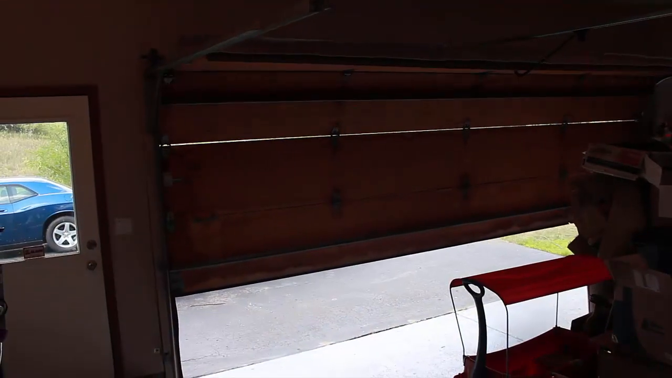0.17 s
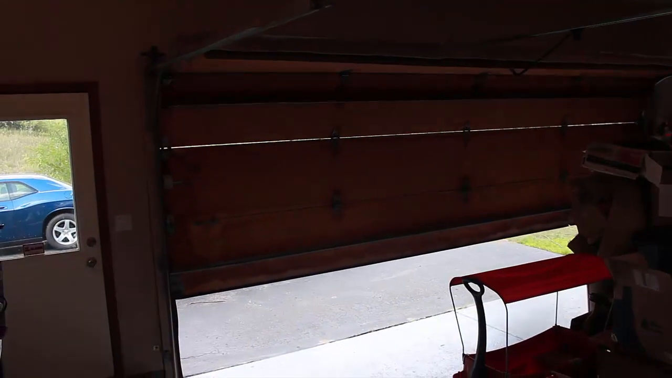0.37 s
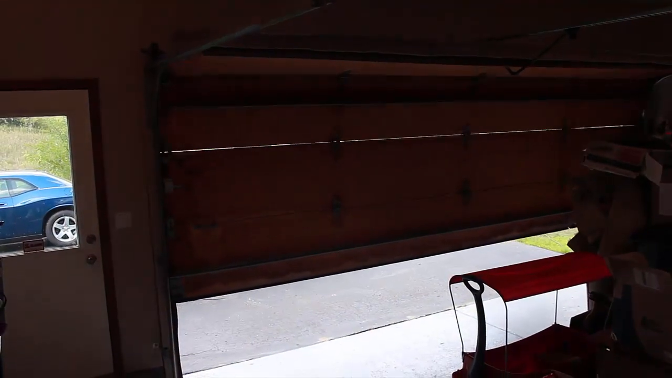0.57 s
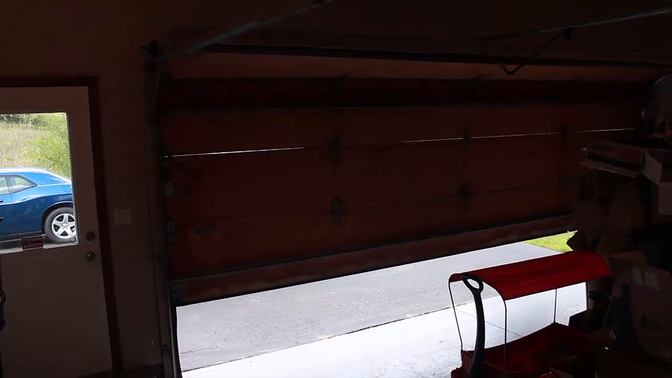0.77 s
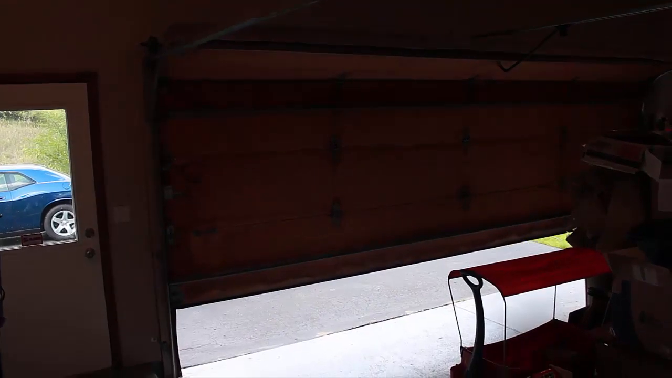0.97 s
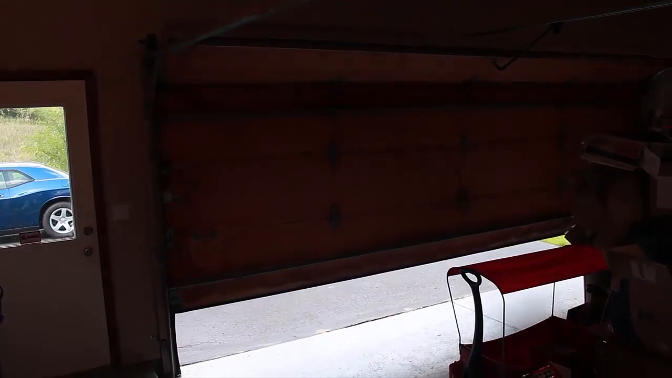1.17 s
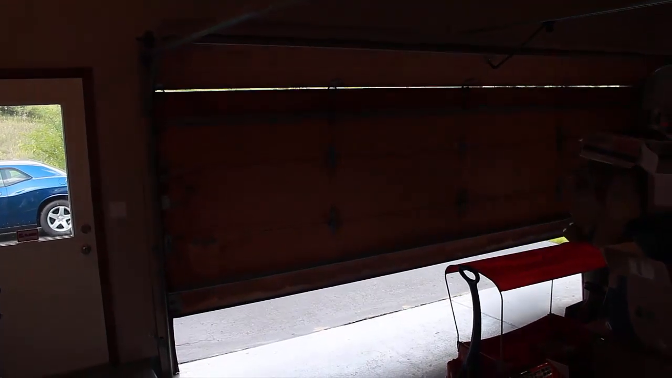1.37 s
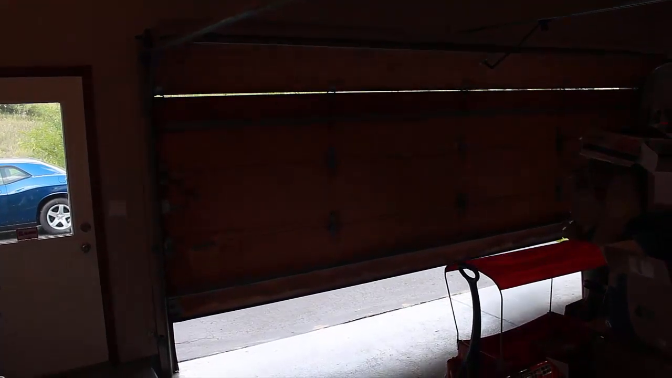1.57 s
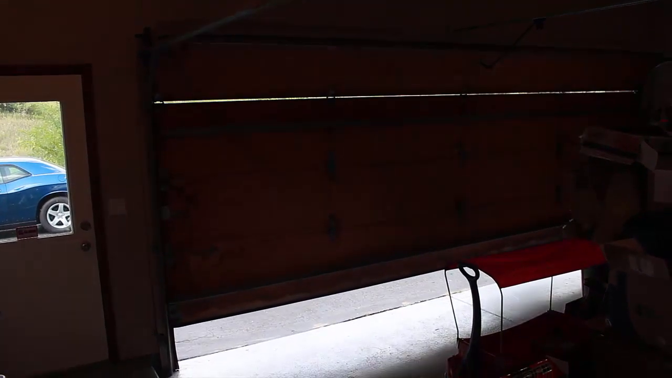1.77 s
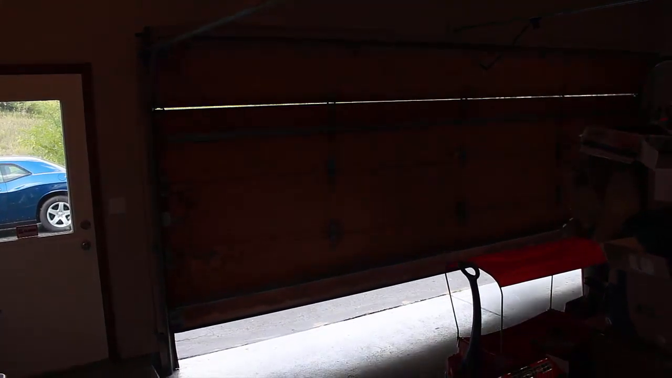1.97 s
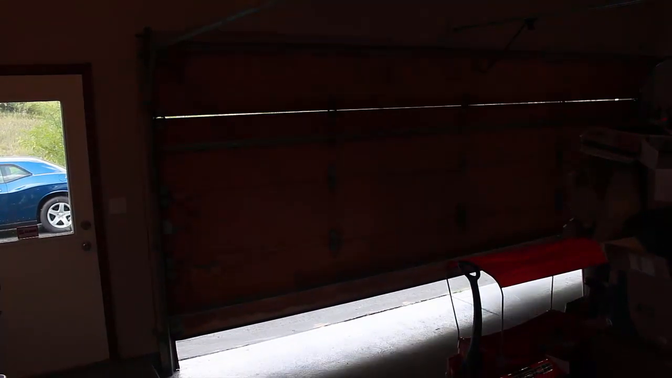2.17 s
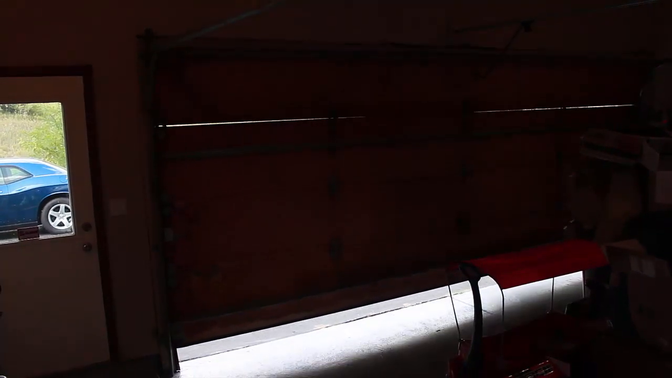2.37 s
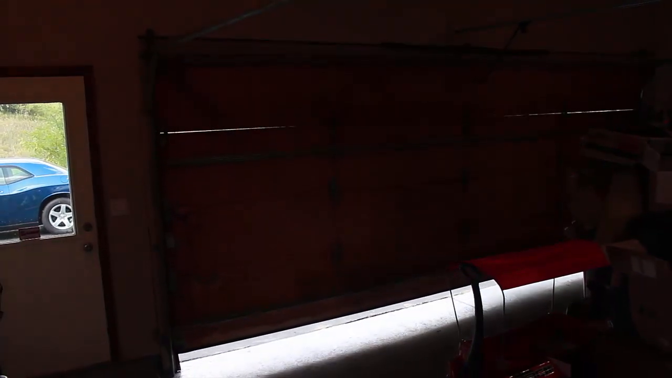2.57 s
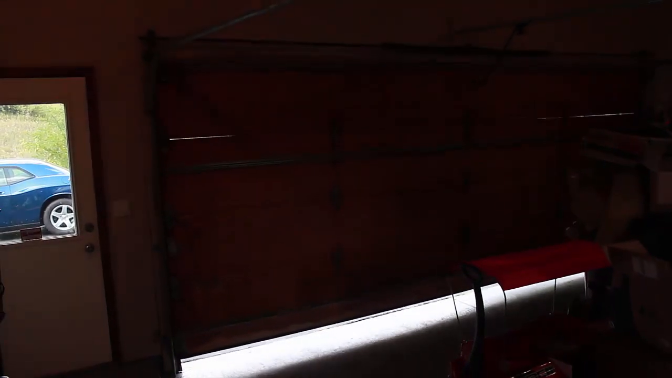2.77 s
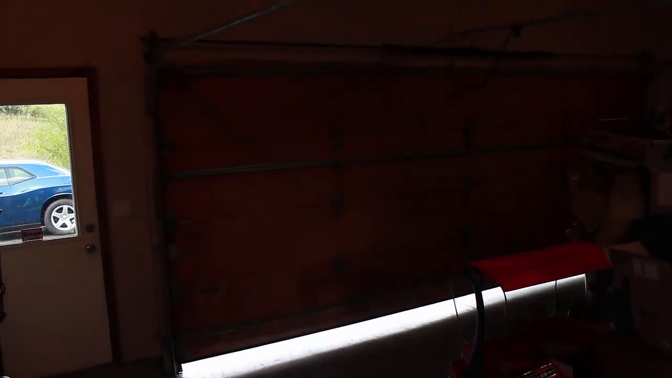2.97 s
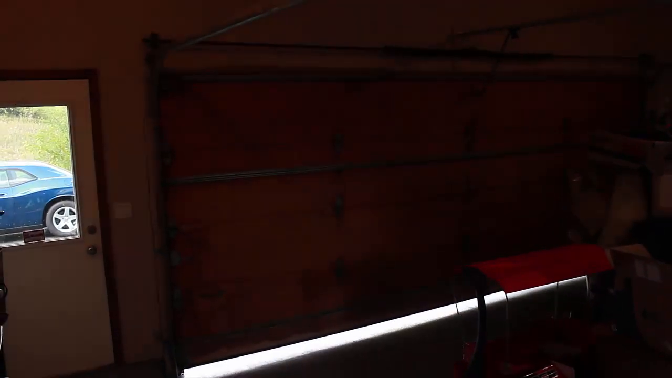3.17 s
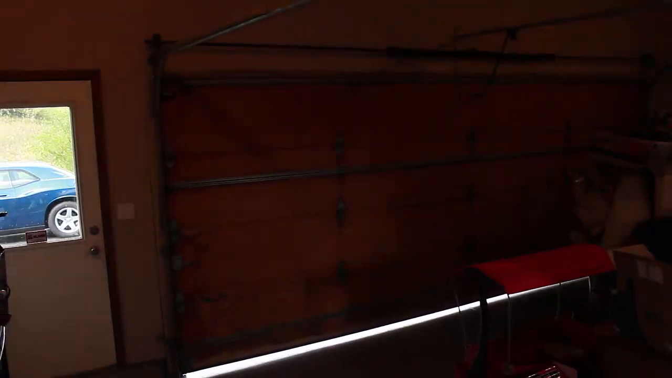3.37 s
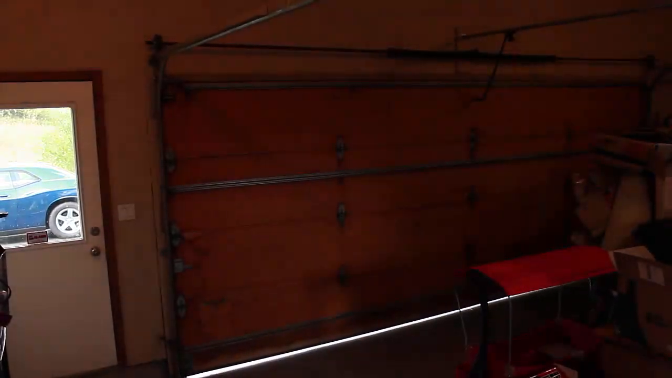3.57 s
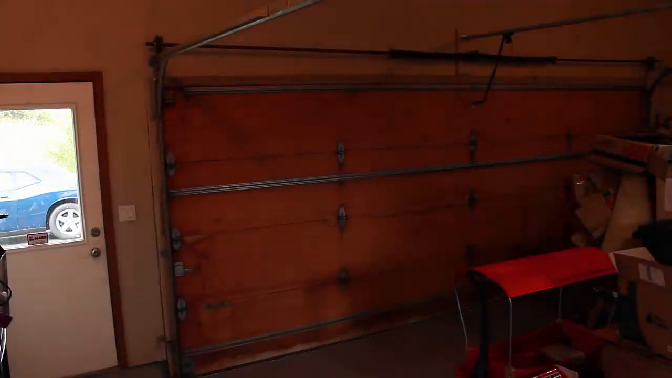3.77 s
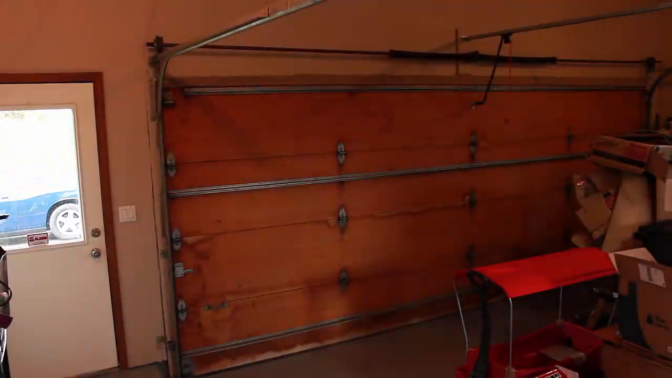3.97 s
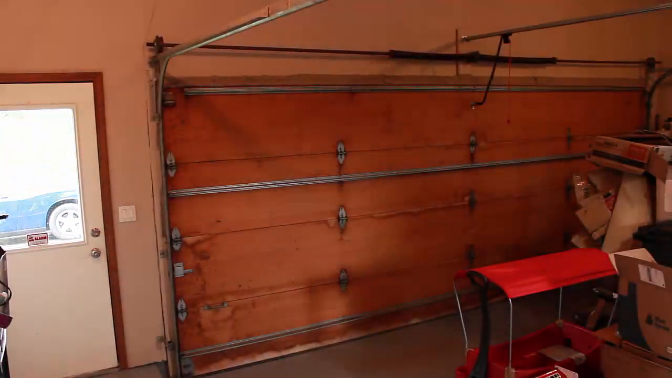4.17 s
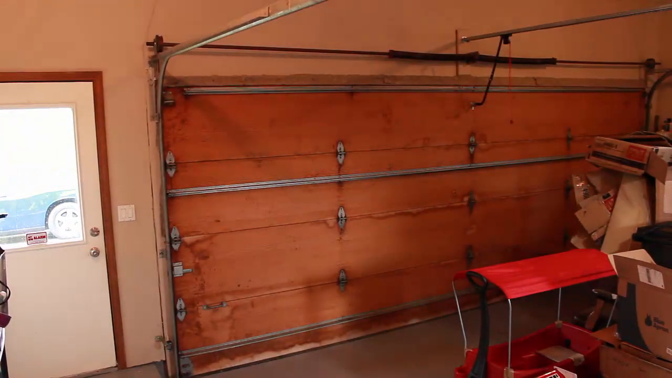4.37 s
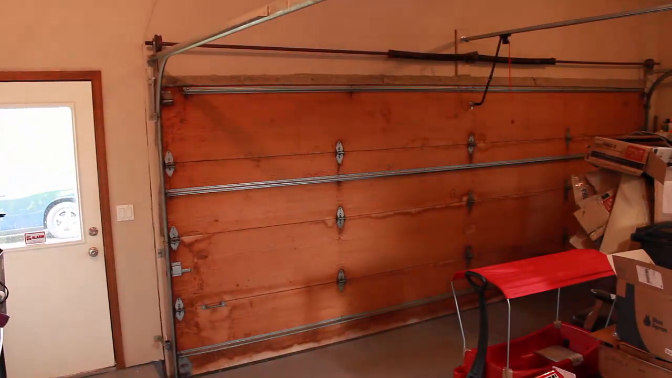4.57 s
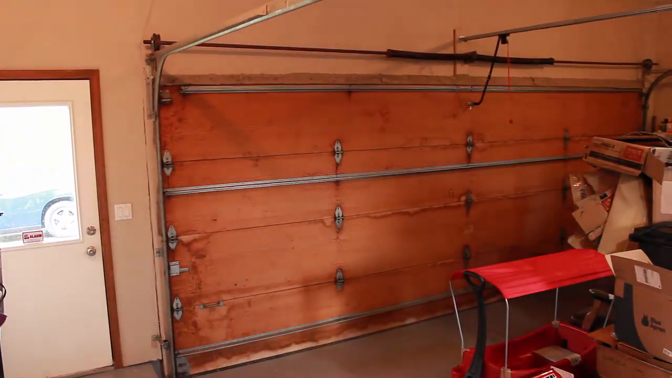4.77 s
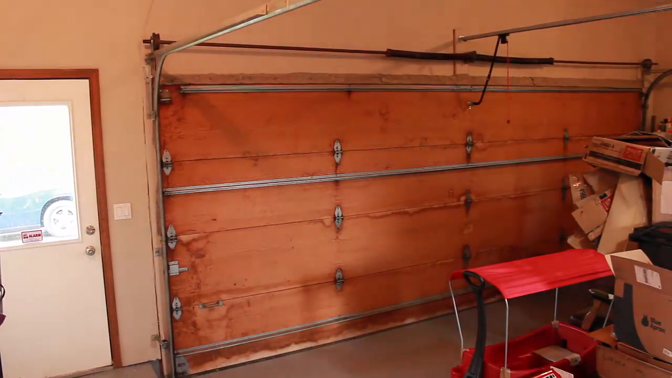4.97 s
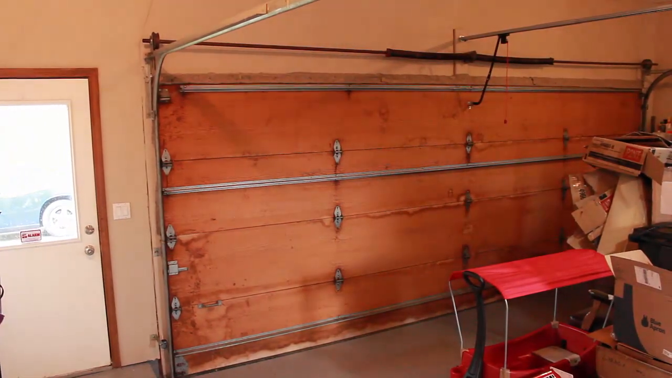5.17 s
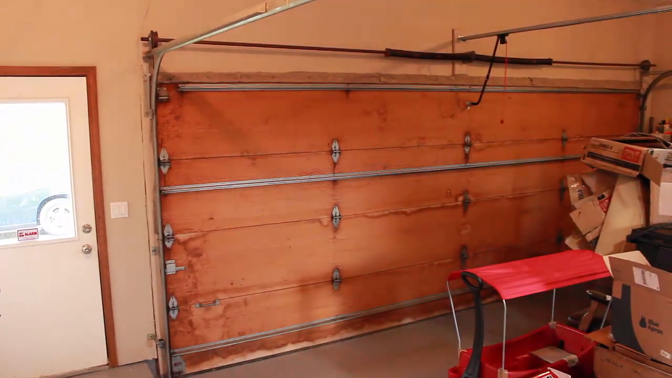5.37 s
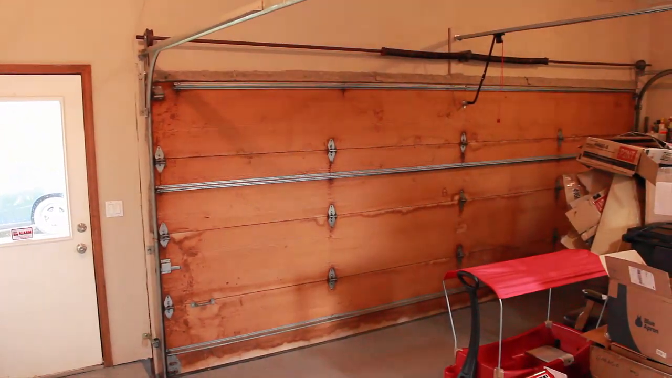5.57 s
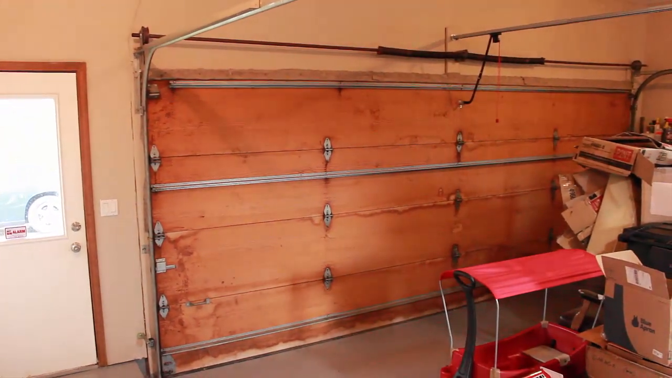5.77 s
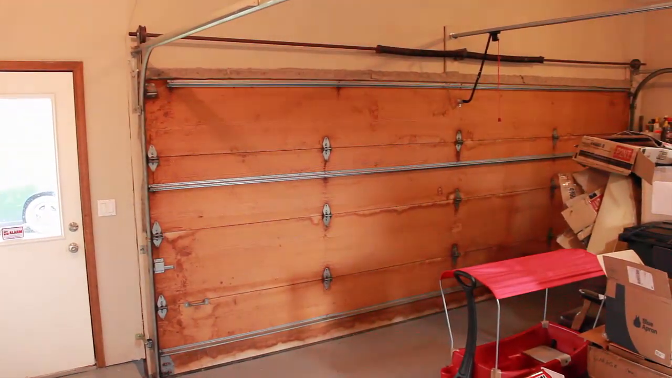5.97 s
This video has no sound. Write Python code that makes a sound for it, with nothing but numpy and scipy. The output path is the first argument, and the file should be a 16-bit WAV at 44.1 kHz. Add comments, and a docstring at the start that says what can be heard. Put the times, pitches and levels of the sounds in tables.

```python
"""In a garage, a heavy wooden door rolls down its steel tracks under a chain opener.
Random impacts filtered by resonant bodies make rattling rollers, clinking chain, rumbling panels and hinge knocks;
noise through narrow resonances makes grinding and a groan, and the edges rub by stick-slip over the last stretch.
A roller whistles as a nearly pure tone, the door thuds on the slab, and the drive stops with a loud
metallic squeal of half-order partials; faint ticks follow over quiet air."""
import sys
import numpy as np
from scipy import signal
from scipy.fft import rfft, irfft, next_fast_len
from scipy.io import wavfile

SR = 44100
rng = np.random.default_rng(int(sys.argv[2]) if len(sys.argv) > 2 else 0)


def transcribe(signal):
    """Save signal, clipped to [-1, 1], as a 16-bit WAV file at the path in sys.argv[1]."""
    frames = np.atleast_2d(signal).T
    limited = np.clip(frames, -1, 1)
    pcm = np.round(limited * 32767).astype(np.int16)
    wavfile.write(sys.argv[1], SR, pcm)


N = 264996
T = np.arange(N) / SR  # time [s]
STOP_S = 3.99  # the door lands and the motion ends

# Resonant response of the hinges and loose hardware: (frequency [Hz], spectral level [dB per Hz])
HINGE = [(150, -17.5), (400, -4.5), (800, -7), (1400, 1), (2100, -2), (2900, -4.5), (4000, -14.5),
         (5500, -20), (8000, -39), (15000, -36)]


def gain_of(db):
    """Amplitude ratio: 20 dB is a factor of ten."""
    return 10 ** (np.asarray(db) / 20)


def evened(x):
    """Normalization to a root-mean-square of 1."""
    return x / np.sqrt(np.mean(x ** 2) + 1e-20)


def read(points, hz):
    """Interpolation of a spectrum along a logarithmic frequency axis."""
    f, value = np.transpose(points)
    return np.interp(np.log(hz + 1), np.log(f + 1), value)


def level(rows, lead=0., axis=1):
    """Envelope from one dB column, read early by lead [s] to allow for the room's build-up."""
    s, db = np.transpose(rows)[[0, axis]]
    early = T + lead
    outside = np.maximum(s[0] - early, 0) + np.maximum(early - s[-1], 0)
    return gain_of(np.interp(early, s, db) - 1000 * outside)  # beyond the ends it falls 1000 dB per s


def spell(start, attack, hold, fade_db_per_s):
    """Envelope: a smooth attack, a hold counted from the start, then exponential decay."""
    age = T - start
    rise = np.sin(np.pi / 2 * np.clip(age / attack, 0, 1)) ** 2
    return rise * gain_of(-fade_db_per_s * np.maximum(age - hold, 0))


def add(mix, s, sound):
    """Superposition of a sound starting at s [s]."""
    part = mix[max(round(s * SR), 0):][:len(sound)]
    part += sound[:len(part)]


def wander(hz):
    """Low-passed Gaussian noise of rms 1: a random fluctuation up to about this rate."""
    size = next_fast_len(N, real=True)
    f = np.fft.rfftfreq(size, 1 / SR)
    slow = irfft(rfft(rng.standard_normal(size)) / (1 + (f / hz) ** 4))
    return evened(slow[:N])


def body(x, spectrum, size=4096):
    """Convolution with a minimum-phase impulse response of unit energy and this spectrum."""
    f = abs(np.fft.fftfreq(size, 1 / SR))
    log_gain = np.log(gain_of(np.maximum(read(spectrum, f), -100)))
    # the Hilbert transform of the log magnitude supplies the causal phase
    taps = np.fft.ifft(np.exp(np.conj(signal.hilbert(log_gain)))).real[:size // 2]
    return signal.oaconvolve(x, taps / np.linalg.norm(taps))[:N]


def resonate(x, hz, width):
    """Double-pole resonance of rms 1, tuned by shifting its frequency, which may glide, down to zero and back."""
    turn = np.exp(2j * np.pi * np.cumsum(hz * np.ones(len(x))) / SR)
    r = np.exp(-np.pi * width / SR)
    shifted = signal.lfilter([1], [1, -2 * r, r * r], x / turn)
    return evened((turn * shifted).real)


def contacts(per_s, spread_db):
    """Random point process: tiny impacts of either sign, a few much harder than the rest."""
    size = gain_of(spread_db * np.minimum(rng.exponential(1, N), 4))
    happens = rng.random(N) < per_s / SR
    return evened(size * rng.choice([-1, 1], N) * happens)


def burst(t60, rise=0.00023):
    """Exponentially decaying noise: loose parts chatter for a moment after a blow."""
    t = T[:SR // 2]
    return rng.standard_normal(len(t)) * gain_of(-60 * t / t60) * (1 - np.exp(-t / rise))


def reflections(size=20):
    """Reverberation: dense random-sign echoes of total energy 1, each band with its own decay."""
    # Reverberation time of the garage: (frequency [Hz], t60 [s])
    decay_times = [(100, 0.7), (400, 0.72), (1200, 0.36), (3000, 0.59), (6000, 0.32), (14000, 0.41)]
    taps = np.zeros(SR // 2)
    at = np.arange(8 * size, len(taps) - size, size)
    taps[at + rng.integers(0, size, len(at))] = rng.choice([-1., 1.], len(at))  # one echo per slot
    hz, t, z = signal.stft(taps, SR, nperseg=256)
    decay = gain_of(-60 * t / read(decay_times, hz)[:, None])
    tail = signal.istft(z * decay, SR, nperseg=256)[1]
    return tail / np.linalg.norm(tail)


def garage(x, wet_db, count=4):
    """Direct plus reverberant field: power-preserving crossfades cycle the echo patterns every 2 s."""
    echoes = np.zeros(N)
    for k in range(count):
        share = np.maximum(np.cos(2 * np.pi * (T / 2 - k / count)), 0)
        echoes += signal.oaconvolve(x * share, reflections())[:N]
    wet = gain_of(wet_db)
    return (x + wet * echoes) / np.hypot(1, wet)


def travel(db, follow, drag_db=0):
    """Common excitation: a part gains follow dB per dB of rattle, shifts as the door drags, ends on landing."""
    # How hard the moving door rattles: (time [s], level [dB])
    rattle_curve = [(0, -30), (0.22, -34), (0.38, -42), (0.49, -25), (0.62, -32), (0.75, -33), (0.9, -39.5),
                    (1.65, -35.5), (1.95, -28.5), (2.3, -34.5), (2.65, -33.5), (3.08, -29.5), (3.33, -28.5),
                    (3.55, -39.5), (3.88, -39), (3.97, -30.5)]
    usual_db, stop_db_per_s = -34, 899
    drag_s, drag_onset_s = 3.2, 0.24  # middle and length of the onset
    rattle = np.interp(T, *np.transpose(rattle_curve)) - usual_db
    drag = np.clip((T - drag_s) / drag_onset_s + .5, 0, 1)
    stop = stop_db_per_s * np.maximum(T - STOP_S, 0)
    return gain_of(db + follow * rattle + drag_db * drag - stop)


def air():
    """Broadband background: stationary Gaussian noise shaped by a fixed spectrum."""
    # Quiet air in the garage: (frequency [Hz], spectral level [dB per Hz])
    air_spectrum = [(20, -22), (40, -3.5), (55, 11.5), (90, 0.5), (140, -2.5), (220, 6.5), (480, 0),
                    (750, -6.5), (1100, -7), (1600, -13), (2100, -14), (2400, -10), (2850, -21),
                    (5000, -20), (9000, -25), (15500, -24)]
    return gain_of(-56) * evened(body(rng.standard_normal(N), air_spectrum))


def rollers():
    """Impact excitation: rollers chatter in unevenly clumped contacts that ring the steel tracks."""
    # Resonant response of the tracks: (frequency [Hz], spectral level [dB per Hz])
    track = [(240, -36), (400, -28), (526, -3.5), (639, 2.5), (710, -3), (897, 1.5), (1180, -10.5),
             (1340, 0), (1470, -6), (1930, -0.5), (2750, -9.5), (3660, -10.5), (9000, -33), (11700, -64),
             (19800, -120)]
    clumps = gain_of(2 * wander(hz=40))
    chatter = contacts(per_s=1700, spread_db=3.0) * clumps
    return evened(body(chatter, track)) * travel(db=-32, follow=0.7)


def panels():
    """Forced vibration: many small impacts make the wooden sections rumble at their low modes."""
    # Resonant response of the sections: (frequency [Hz], spectral level [dB per Hz])
    wood = [(20, -33.5), (38, -31), (55, -15.5), (100, -17), (130, -8), (172, 0.5), (215, 1.5), (300, -0.5),
            (520, -4.5), (800, -17), (1500, -38.5)]
    calm_db_per_s = 1.23  # they shake less as they leave the bend
    # they strain once the door drags
    shaking = travel(-35 - calm_db_per_s * T, follow=0.1008, drag_db=4)
    return evened(body(contacts(per_s=2500, spread_db=3.0), wood)) * shaking


def grinding():
    """Narrow-band friction noise: each spell of rollers and struts on steel rings one resonance."""
    # Spells of grinding: (time [s], length [s], frequency [Hz], width [Hz], level [dB])
    grinds = [(0.0, 0.27, 1063, 152, -32.5), (0.586, 0.13, 1404, 110, -30), (0.928, 0.31, 1374, 130, -35.5),
              (1.441, 0.17, 1350, 79, -39.5), (1.757, 0.27, 1890, 300, -35.5),
              (1.778, 0.15, 1330, 120, -37), (2.428, 0.55, 1394, 114, -34), (3.006, 0.25, 1408, 80, -31.5),
              (3.984, 0.14, 1010, 131, -28)]
    out = np.zeros(N)
    for s, length, hz, width, db in grinds:
        size = int(length * SR)
        ring = resonate(rng.standard_normal(size), hz, width)
        add(out, s, gain_of(db) * ring * signal.windows.tukey(size, .3))
    return out


def drone():
    """Modal hum: the motion keeps one panel mode droning, unsteady in pitch and level, with a rough octave."""
    # Passing swells of the hum: (time [s], length [s], level [dB])
    swells = [(0.743, 0.28, -39), (1.407, 0.3, -41.5), (1.8, 0.3, -36.5), (2.164, 0.21, -38.5),
              (2.926, 0.21, -37.5)]
    mode_hz = 326
    phase = 2 * np.pi * np.cumsum(mode_hz + 5 * wander(hz=23.95)) / SR
    hum = evened(np.sin(phase) * gain_of(2 * wander(hz=25.1)))
    octave = resonate(rng.standard_normal(N), 2 * mode_hz, width=65)
    swell = travel(db=-51.5, follow=0)
    for s, length, db in swells:
        add(swell, s, gain_of(db) * signal.windows.tukey(int(length * SR), .7))
    return (hum + gain_of(-6.5) * octave) * swell


def chain():
    """Impact trains: links clink over the sprocket, jerk at the landing, and the slack run slaps the rail."""
    # Resonant response of the links: (frequency [Hz], spectral level [dB per Hz])
    links = [(2200, -1), (3200, 14), (4200, 12.5), (5500, 7.5), (7800, -1.5), (11000, -3.5), (15500, -5.5)]
    # Slaps on the rail: (time [s], level [dB])
    slap_times = [(0.0672, -23), (0.1436, -25), (0.2235, -21.5), (1.047, -26), (1.38, -21.5), (1.572, -27),
                  (1.746, -21.5), (2.296, -16.5), (2.7586, -22), (3.0028, -17.5), (3.062, -18.5),
                  (3.1223, -20), (3.2104, -19.5), (3.274, -22.5), (3.6516, -24), (3.7635, -25),
                  (3.9766, -17.5)]
    jerk_s = 0.11
    jerk = gain_of(-35) * spell(STOP_S - jerk_s / 2, attack=0.034, hold=jerk_s, fade_db_per_s=401.5)
    clinks = evened(contacts(per_s=2600, spread_db=2.0) * gain_of(1.3 * wander(hz=40.2)))
    # the chain pulls taut once the door drags
    clinks = clinks * (travel(db=-39.5, follow=0.24, drag_db=-1.5) + jerk)
    slaps = np.zeros(N)
    for s, db in slap_times:
        add(slaps, s, gain_of(db) * burst(t60=0.063, rise=0.0062))
    return body(clinks + slaps, links)


def knocks():
    """Impulsive excitation: hinge play is taken up with a loose clack that favours one resonance."""
    # Knocking hinges and rollers: (time [s], level [dB], ring frequency [Hz])
    blow_list = [(0.145, -17, 1200), (0.222, -18.5, 1590), (0.696, -14, 1367), (0.776, -21.5, 1540),
                 (1.044, -19.5, 1340), (1.489, -20, 840), (1.743, -24.5, 2080), (1.925, -22, 1800),
                 (2.106, -19, 1970), (2.141, -20.5, 734), (2.273, -22, 660), (2.448, -19, 1910),
                 (2.636, -23, 1410), (2.731, -18.5, 950), (2.835, -19, 1360), (2.869, -15.5, 870),
                 (3.002, -18, 1440), (3.045, -13.5, 1120), (3.121, -14.5, 900), (3.209, -18, 1400),
                 (3.275, -17, 1380), (3.503, -18.5, 1170)]
    ring_db = -1.5  # peak of the ring against the clack's level
    blows, rings = np.zeros(N), np.zeros(N)
    for s, db, hz in blow_list:
        add(blows, s, gain_of(db) * burst(t60=0.042, rise=0.0007))
        ring = resonate(burst(t60=0.05), hz, width=170)
        add(rings, s, gain_of(db + ring_db) * ring / abs(ring).max())
    return body(blows, HINGE) + rings


def crashes():
    """Broadband impact: heavy blows set all the hardware clattering with exponential decay."""
    # A section drops through the bend, later the door lands: (time [s], level [dB], clatter t60 [s])
    crash_list = [(0.488, -14.5, 0.11), (0.499, -8.5, 0.12), (3.975, -13, 0.15), (3.999, -11.5, 0.1)]
    blows = np.zeros(N)
    for s, db, t60 in crash_list:
        add(blows, s, gain_of(db) * burst(t60, rise=0.0054))
    return body(blows, HINGE)


def bumps():
    """Free decay of a bending mode: the whole door flexes with a soft low boom."""
    # Dull bumps of the door: (time [s], level [dB], frequency [Hz], t60 [s])
    bump_list = [(0.51, -41, 63.6, 0.49), (0.98, -41, 71.4, 0.54), (1.39, -29, 54.6, 0.26),
                 (2.73, -41, 54, 0.54), (2.919, -36.5, 81, 0.54), (3.98, -32, 176, 0.4)]
    out, t = np.zeros(N), T[:SR]
    for s, db, hz, t60 in bump_list:
        envelope = gain_of(db - 60 * t / t60) * (1 - np.exp(-t / 0.019))
        add(out, s, envelope * np.sin(2 * np.pi * hz * t))
    return out


def rubbing():
    """Stick-slip friction: the edges judder along the frame, with a groan that sinks as the gap closes."""
    # Resonant response of the frame: (frequency [Hz], spectral level [dB per Hz])
    frame = [(250, -27.5), (450, -8), (650, -2), (850, -6), (1050, -0.5), (1250, 1.5), (1500, -11.5),
             (2200, -25.5), (4000, -42.5)]
    # Edges rubbing harder as the gap closes: (time [s], level [dB])
    rub_curve = [(1.55, -41.5), (2.45, -43.5), (2.85, -32), (3.33, -25), (3.6, -27.5), (3.91, -29.5),
                 (3.98, -21.5)]
    # Groan near the slab: (time [s], pitch [Hz], level before the partials' weights [dB])
    groan = [(3.05, 390, -45), (3.289, 288.5, -41), (3.43, 282, -33), (3.54, 235, -40), (3.85, 219, -35),
             (3.97, 198, -38), (4.05, 186, -50)]
    judder = contacts(per_s=1200, spread_db=4.5) * gain_of(3.0 * wander(hz=45))
    slips = evened(body(judder, frame)) * level(rub_curve, lead=0.012)
    s, pitch, _ = np.transpose(groan)
    hz = np.interp(T, s, pitch)
    low = resonate(rng.standard_normal(N), hz, width=36)
    third = resonate(rng.standard_normal(N), 3 * hz, width=52)
    partials = gain_of(-1) * low + gain_of(3.0) * third
    return slips + partials * level(groan, lead=0.017, axis=2)


def whistle():
    """Self-sustained oscillation: friction keeps one clean mode of a dry roller singing."""
    # Strength of the whistle: (time [s], level [dB])
    whistle_curve = [(3.1, -45), (3.494, -28), (3.66, -28), (3.794, -36), (3.972, -33), (4.178, -53.5),
                     (4.198, -39.5), (4.448, -56.5), (4.55, -82)]
    mode_hz = 3940
    phase = 2 * np.pi * np.cumsum(mode_hz + 2.0 * wander(hz=7.4)) / SR
    tone = np.sin(phase) + gain_of(-35) * np.sin(2 * phase) + gain_of(-44.0) * np.sin(3 * phase)
    return evened(tone) * level(whistle_curve)


def squeal():
    """Stick-slip locking: a steel mode starts flat, locks on and rasps; unequal alternate slips add half orders."""
    # Partials above the fundamental: (multiple [1], level [dB], fade [dB per s])
    overtones = [(1.5, -40, 130.5), (2, -32, 124), (2.5, -58.5, 90.5), (3, -44.5, 150.5), (4, -54, 181.5),
                 (5, -57, 181)]
    # Friction noise of the rasp: (frequency [Hz], spectral level [dB per Hz])
    rasp_spectrum = [(900, -22), (1600, -4.5), (2200, -2.5), (2700, 3), (3300, -8), (4300, -4), (7000, -17),
                     (15000, -29.5)]
    start_s, lock_s = 4.025, 0.066
    locked_hz, flat_hz = 2840, 20
    hz = locked_hz - flat_hz * np.exp(-((T - start_s) / lock_s) ** 4)
    phase = 2 * np.pi * np.cumsum(hz + 5 * wander(hz=150)) / SR

    first_dip_s, throb_s, throb_depth = 4.2, .093, 0.88
    throbs = (T - first_dip_s) / throb_s
    throb = 1 - throb_depth * (1 - abs(np.sin(np.pi * throbs))) * (throbs > -.5)
    swell = gain_of(-12) * spell(start_s, attack=0.081, hold=0.2, fade_db_per_s=147) * throb

    edge = np.zeros(N)
    for k, db, fade in overtones:
        partial = np.sin(k * phase + 1.1 * wander(hz=59.4))
        strength = gain_of(db + 3.5 * wander(hz=70.5))
        # the overtones come sooner; the lower ones fade more slowly than the fundamental, the upper ones faster
        edge += strength * partial * spell(start_s, attack=0.027, hold=0.19, fade_db_per_s=fade)
    rasp = gain_of(-22.5) * evened(body(rng.standard_normal(N), rasp_spectrum)) * swell
    return evened(np.sin(phase)) * swell + garage(edge + rasp, wet_db=-10)


def settling():
    """Stress release: the hardware relaxes in faint, rapidly damped ticks."""
    # Ticks: (time [s], level [dB])
    tick_times = [(4.9097, -56), (5.5318, -52.5), (5.8132, -54)]
    # Resonant response of a tick: (frequency [Hz], spectral level [dB per Hz])
    tick_spectrum = [(2000, -25), (3500, -8.5), (5000, -1), (7000, -11), (12000, -20)]
    out = np.zeros(N)
    for s, db in tick_times:
        add(out, s, gain_of(db) * burst(t60=.015))
    return body(out, tick_spectrum)


def scene():
    """Superposition of all sources, almost in mono: only a faint low fluctuation is in antiphase."""
    running = garage(rollers() + panels() + grinding() + rubbing(), wet_db=-2.0)
    clacking = garage(chain() + knocks() + crashes() + settling(), wet_db=-2.0)
    tones = drone() + bumps() + whistle() + squeal()
    low_side = gain_of(-67) * wander(hz=75.5)
    return running + clacking + tones + air() + np.array([low_side, -low_side])


def record(dry):
    """Band limitation: a linear-phase low-pass removes the top of the spectrum."""
    edge_hz = 15650
    taps = signal.firwin(1023, edge_hz, window=("kaiser", 9), fs=SR)
    return signal.oaconvolve(dry, taps[None], "same")


dry = scene()
out = record(dry)
transcribe(out)
```